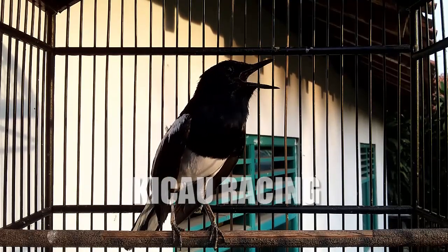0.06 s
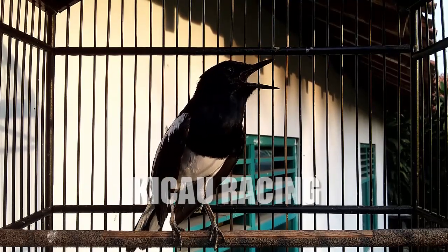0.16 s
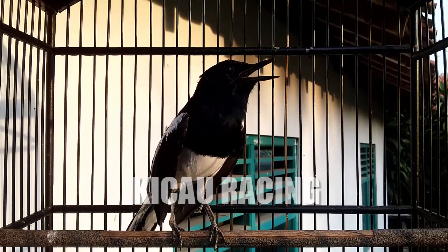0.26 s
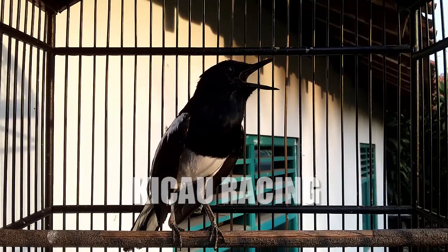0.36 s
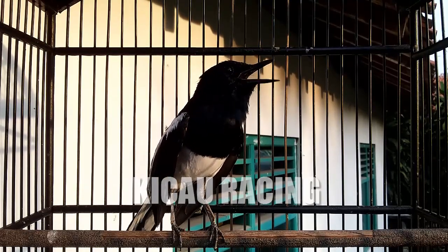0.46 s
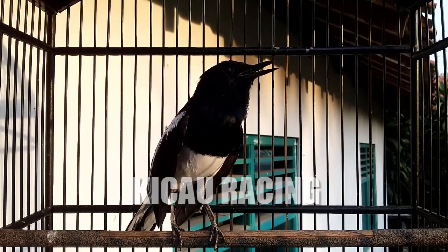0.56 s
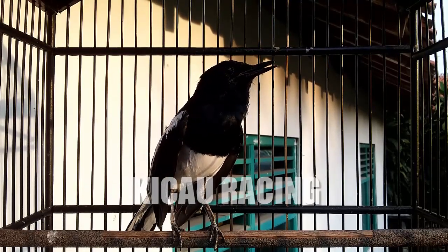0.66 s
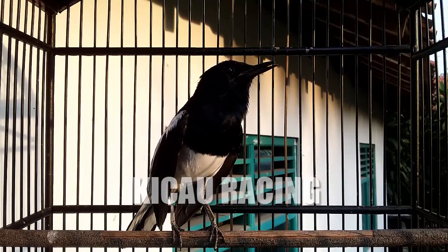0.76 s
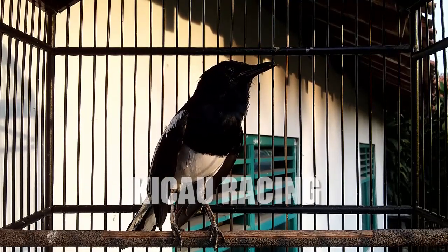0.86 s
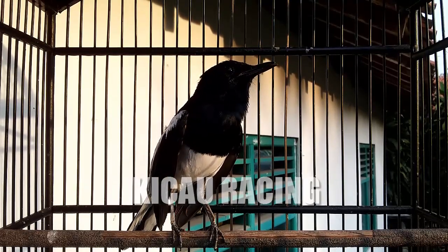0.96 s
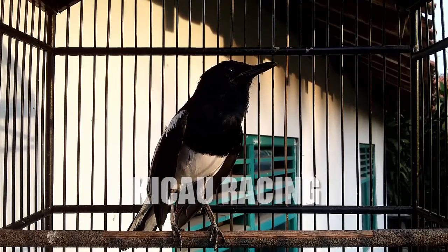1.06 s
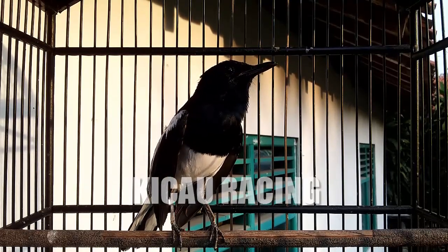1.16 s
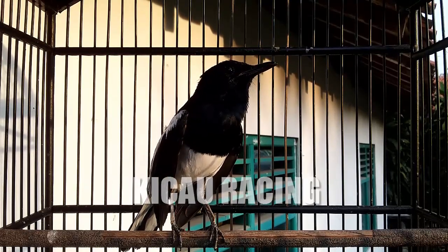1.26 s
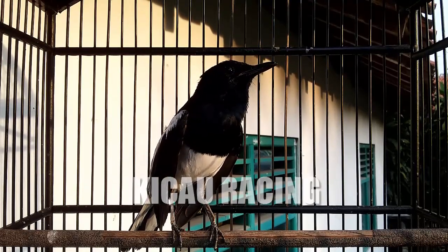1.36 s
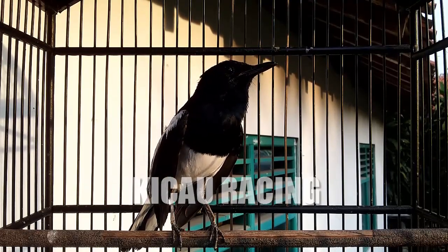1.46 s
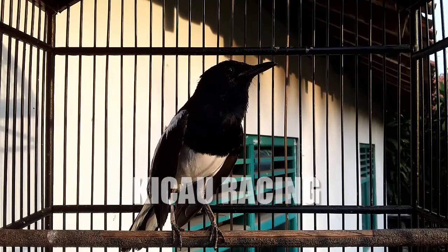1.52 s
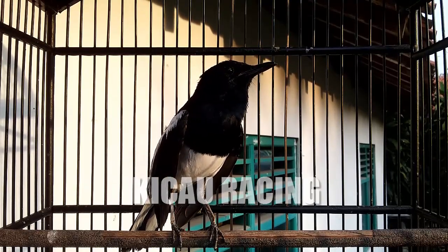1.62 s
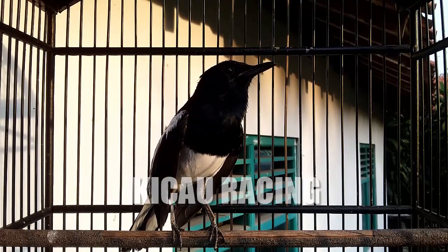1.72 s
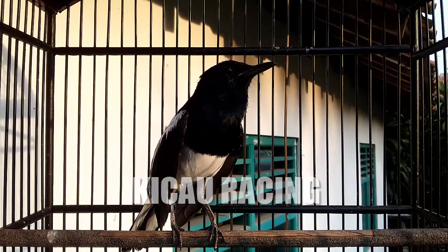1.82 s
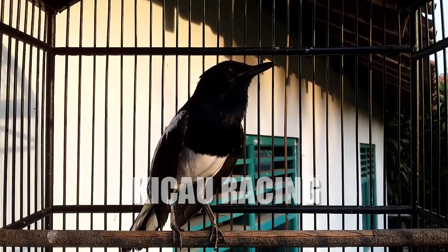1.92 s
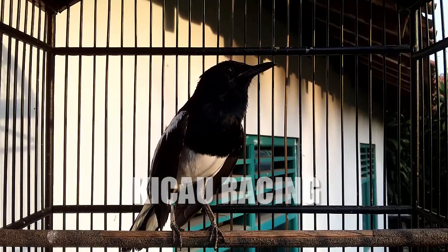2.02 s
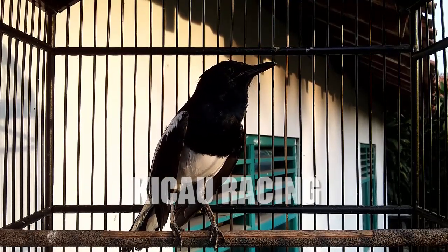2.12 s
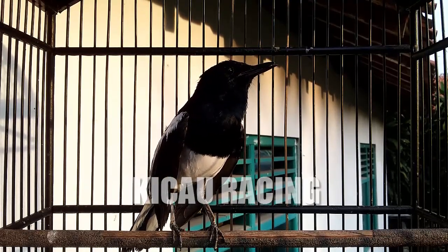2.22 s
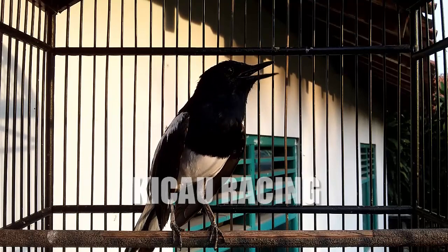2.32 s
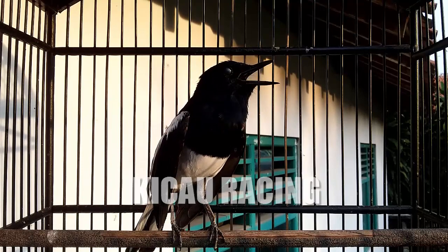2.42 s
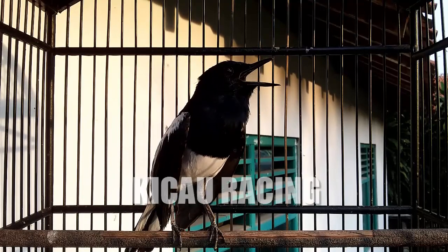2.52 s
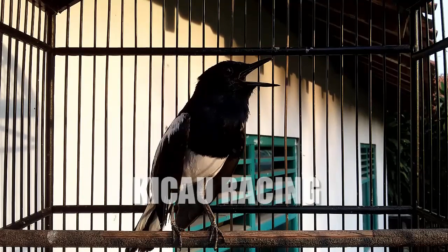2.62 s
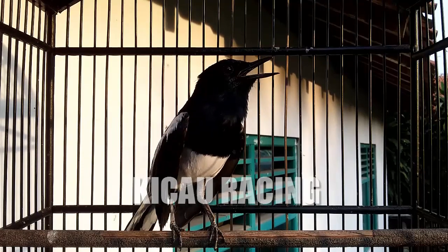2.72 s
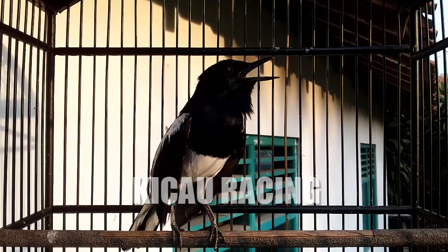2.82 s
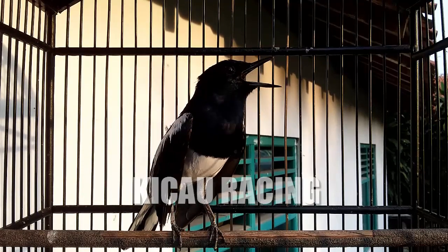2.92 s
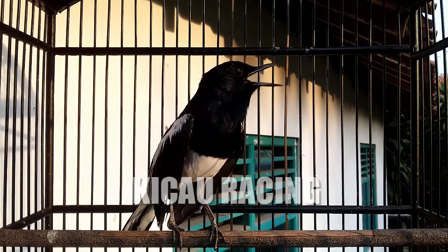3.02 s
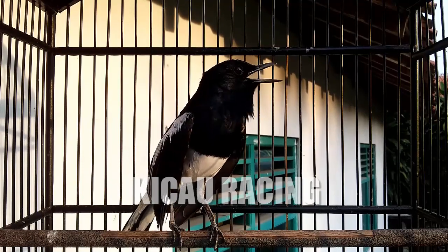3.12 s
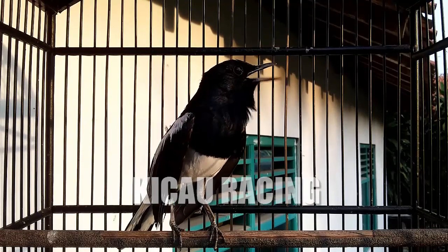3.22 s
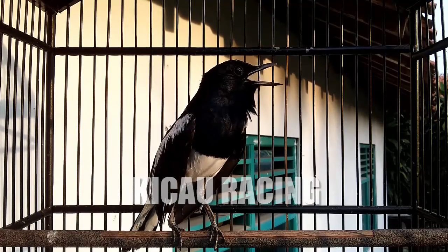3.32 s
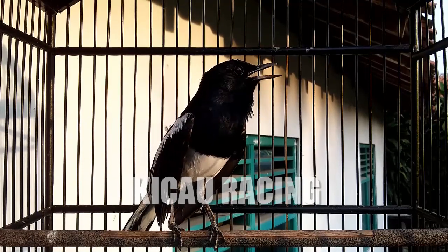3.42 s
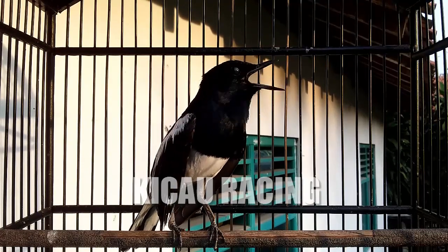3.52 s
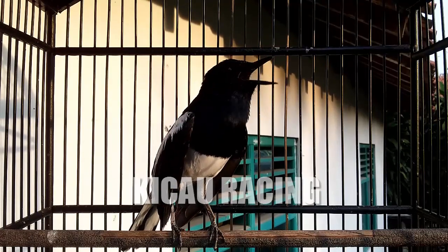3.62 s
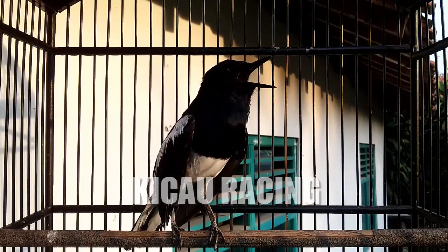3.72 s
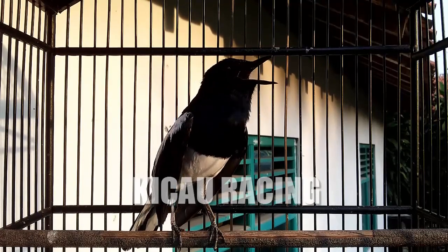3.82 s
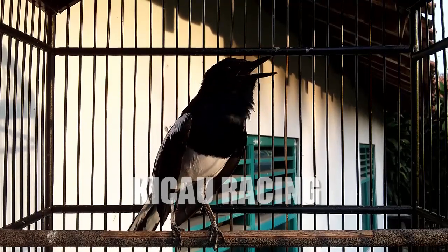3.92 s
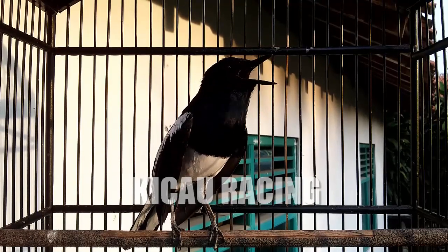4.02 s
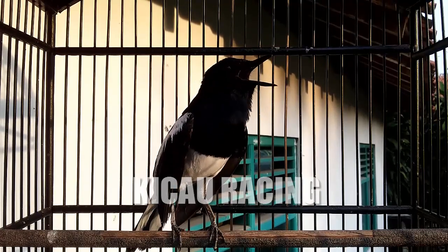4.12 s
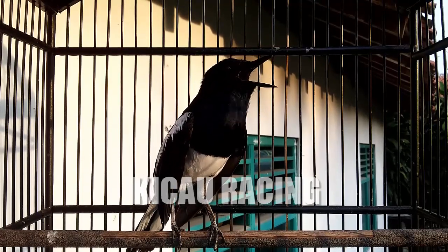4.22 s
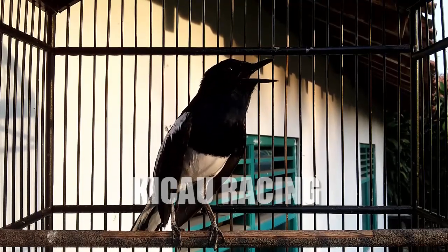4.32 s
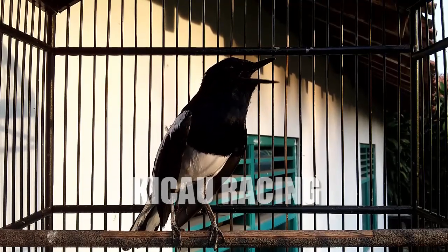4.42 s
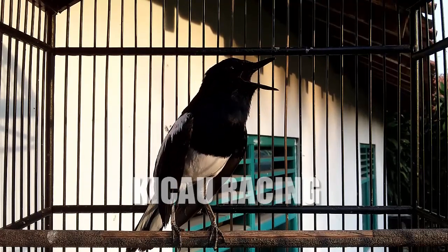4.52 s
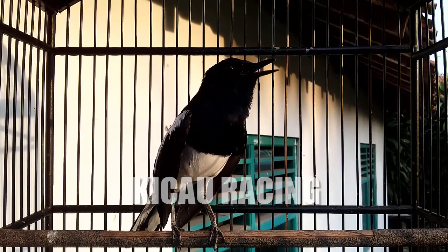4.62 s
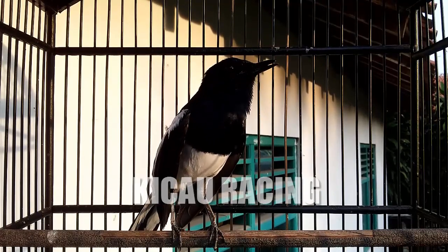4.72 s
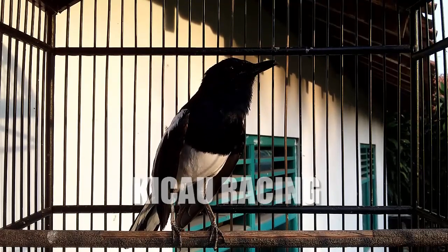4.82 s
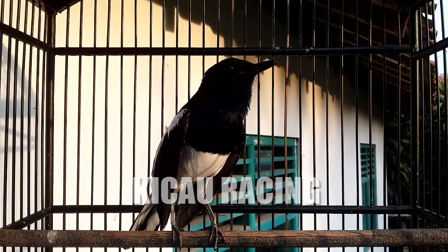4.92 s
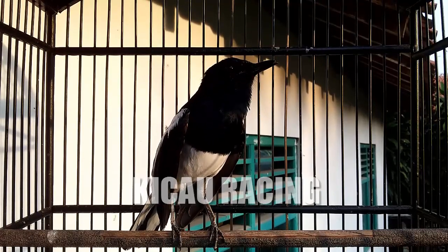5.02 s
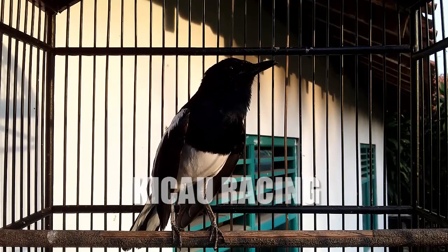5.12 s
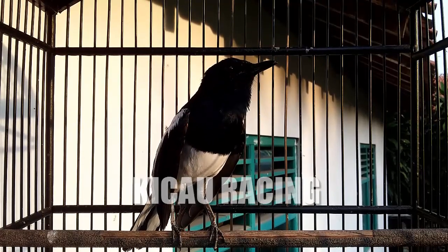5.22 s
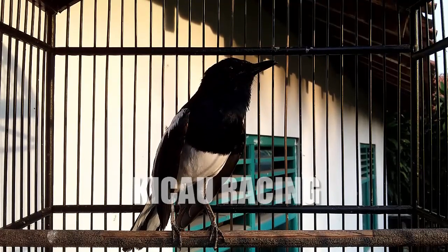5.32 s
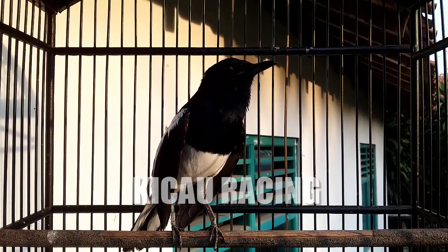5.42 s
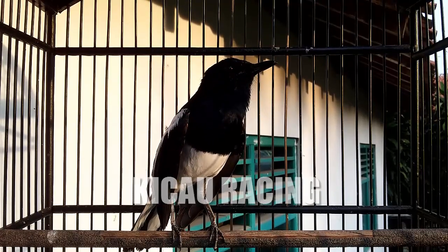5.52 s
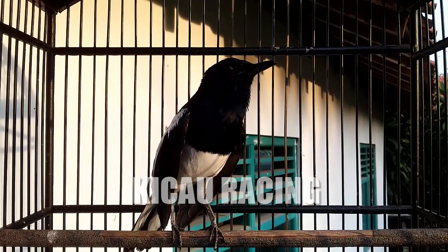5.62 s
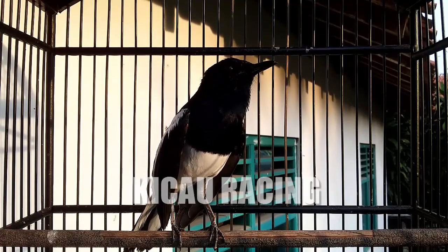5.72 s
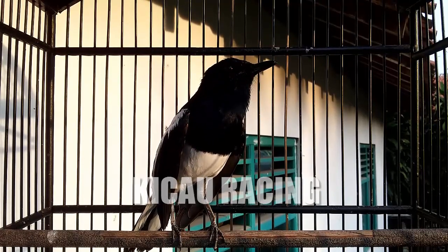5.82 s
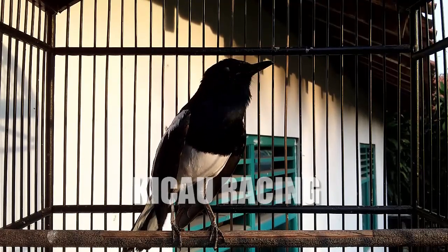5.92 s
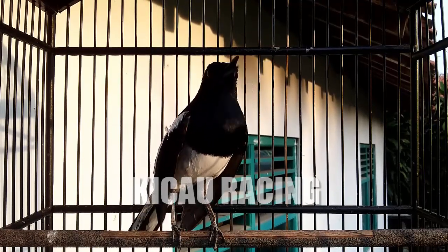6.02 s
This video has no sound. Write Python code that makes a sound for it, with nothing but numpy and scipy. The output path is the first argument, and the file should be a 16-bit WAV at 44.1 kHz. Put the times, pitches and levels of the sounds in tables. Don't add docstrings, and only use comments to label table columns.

```python
import sys
import numpy as np
from scipy import signal
from scipy.fft import rfft, irfft
from scipy.io import wavfile
from scipy.ndimage import uniform_filter1d, minimum_filter1d, map_coordinates

SR = 44100
rng = np.random.default_rng(int(sys.argv[2]) if len(sys.argv) > 2 else 0)


def elevation(decibels):
    levels = np.asarray(decibels, float)
    return 10 ** (levels / 20)


def file_out(sig):
    cols = np.atleast_2d(sig).T
    lim = np.clip(cols, -1, 1)
    pcm = np.round(lim * 32767).astype(np.int16)
    wavfile.write(sys.argv[1], SR, pcm)


N = 267246


def unit(x):
    return x / np.sqrt(np.mean(x ** 2) + 1e-20)


def along(points, hz):
    f, v = np.transpose(points)
    return np.interp(np.log(hz + 1), np.log(f + 1), v)


def wobble(rate):
    knots = rng.standard_normal(int(N * rate / SR) + 4)
    return map_coordinates(knots, [np.arange(N) * rate / SR])


def note(rows, fade, release):
    s, *cols = np.transpose(rows)
    span = np.arange(round(s[0] * SR), round(s[-1] * SR))
    t = span / SR
    gate = np.clip(np.minimum((t - s[0]) / fade, (s[-1] - t) / release), 0, 1)
    return span, gate, [uniform_filter1d(np.interp(t, s, c), size=60) for c in cols]


def blips(events, rise, life):
    out, t = np.zeros(N), np.arange(SR // 10) / SR
    for s, hz, db in events:
        shape = (1 - np.exp(-t / rise)) * np.exp(-t / life)
        out[round(s * SR):][:len(t)] += elevation(db + 6.5) * shape * np.sin(2 * np.pi * hz * t)
    return out


# t/s, f/Hz, peak level/dB
PIPS = [(2.931, 3177, -31.5), (2.94, 3810, -24.5), (3.28, 3080, -26), (3.793, 3570, -28.5),
        (3.808, 4790, -18), (4.582, 4800, -35)]
# t/s, level/dB
BREAKS = [(.193, -8), (0.214, -10), (.288, -5.5), (.51, -9), (.53, -16), (3.919, -9), (4.281, -7),
          (4.304, -14), (4.32, -9), (4.363, -7), (4.375, -6), (4.674, -7)]


def songbird():
    bend, swell = trill()
    bend = bend * (1 + .002 * wobble(300))
    swell = swell * elevation(.8 * wobble(120))
    song = np.zeros(N)
    for rows in scoops_and_arches() + warbles():
        sing(song, rows, bend, voice_db=0)
    for rows in whistled_notes():
        sing(song, rows, bend, voice_db=-12.5)
    for rows in bubbling_notes():
        sing(song, rows, bend, voice_db=-18.5, beak=1.25)
    t, half_width_s = np.arange(N) / SR, .0022
    breaks_db = sum(db * np.exp(-((t - s) / half_width_s) ** 2) for s, db in BREAKS)
    return song * swell * elevation(breaks_db) + blips(PIPS, rise=.0015, life=.003)


# f/Hz, octave over fundamental level/dB
OCTAVE = [(1650, 10), (2100, 20), (2330, 18.5), (2550, 6.5), (2850, -6), (3100, -17), (3300, -25),
          (3600, -52.5)]


def sing(song, rows, bend, voice_db, beak=1):
    span, gate, (hz, db) = note(rows, fade=0.00055, release=0.0047)
    hz = hz * bend[span]
    octave = elevation(along(OCTAVE, beak * hz) + voice_db) + elevation(-40)
    turn = 2 * np.pi * np.cumsum(hz) / SR
    tone = np.sin(turn) + octave * (np.sin(2 * turn) + elevation(-30) * np.sin(3 * turn))
    song[span] += gate * elevation(db + 5.0) * tone


# start t/s, end t/s, start rate f/Hz, pitch swing [share], level swing [0-1]
TRILLS = [(.46, .497, 310, .03, .55), (.568, .635, 175, .018, .45), (2.51, 2.55, 165, .026, .5),
          (2.988, 3.065, 200, .105, .3), (3.058, 3.125, 98, .05, .6), (3.305, 3.338, 280, .02, .5),
          (3.42, 3.47, 175, .015, .25), (.079, .125, 260, .015, .35), (4.169, 4.215, 260, .015, .35),
          (.189, .242, 140, .015, .3), (4.6, 4.64, 300, .02, .55), (4.68, 4.708, 200, .012, .2),
          (4.71, 4.765, 170, .018, .45)]


def trill():
    t = np.arange(N) / SR
    bend, swell = np.ones(N), np.ones(N)
    for start, end, rate, swing, depth in TRILLS:
        inside = np.clip(np.minimum(t - start, end - t) / 0.011, 0, 1)
        rate_now = np.interp(t, [start, end], [rate, rate * .8])
        turn = 2 * np.pi * np.cumsum(rate_now * (inside > 0)) / SR + 1.56 * wobble(90)
        bend += inside * swing * (np.sin(turn) + .4 * wobble(500))
        swell += inside * depth * (np.cos(turn + 0.48) - .4)
    return bend, swell


def played(shape, starts):
    return [[(s + after, hz * factor, level + db) for after, hz, level in shape] for s, factor, db in starts]


# t/s after start, f/Hz, level/dB
SCOOP = [(0, 1630, -49), (.028, 2283, -37), (.04, 2500, -37.5), (.048, 2730, -35), (.069, 3440, -44)]
SCOOP_TWIN = [(.003, 1990, -48.5), (.012, 2220, -41), (.022, 2510, -39.5), (.031, 2880, -24.5)]
GRACE = [(0, 1903, -48.5), (.008, 2192, -39.5), (.017, 2400, -39.5)]
ARCH = [(.012, 1726, -39), (.021, 2066, -36.5), (.027, 2280, -32), (.046, 3060, -23.5), (.06, 3340, -24.5),
        (.072, 3302, -20.5), (.081, 2693, -40)]
# start t/s, pitch factor, level/dB
SCOOPS = [
    (.079, 1.01, 2.4),
    (4.169, .99, 2.5),
]
ARCHES = [
    (0.46, .99, 0.7),
    (4.6, 1.01, 2.1),
]


def scoops_and_arches():
    scoops = played(SCOOP, SCOOPS) + played(SCOOP_TWIN, SCOOPS)
    return scoops + played(GRACE, ARCHES) + played(ARCH, ARCHES)


# t/s, f/Hz, level/dB
WARBLE_IN = [
    [(.106, 3376, -26.5), (.117, 4144, -10), (.128, 4365, -14.5), (.138, 4600, -14.5), (.148, 4426, -8.5),
     (.157, 4147, -8), (.178, 4189, -6.5)],
    [(4.196, 3257, -19), (4.204, 3900, -26), (4.209, 4150, -10), (4.217, 4374, -14), (4.238, 4520, -11.5),
     (4.247, 4146, -8.5), (4.258, 3998, -9), (4.272, 4153, -4.5)],
]
# crest t/s, crest f/Hz, level/dB, trough f/Hz, fall t/s
BEATS = [
    [(.189, 4013, -5.5, 3520, 0.012), (.223, 3970, -8, 3373, .011), (.262, 3766, -9.5, 2994, 0.012),
     (.296, 3310, -19, 2508, 0.02), (.337, 2864, -23, 2327, 0.014)],
    [(4.278, 4120, -7, 3590, 0.015), (4.316, 3954, -5.5, 3450, 0.0098), (4.353, 3740, -8, 3114, 0.012),
     (4.386, 3320, -17.5, 2590, .017), (4.425, 2894, -19, 2391, .018)],
]
# t/s, f/Hz, level/dB
WARBLE_OUT = [
    [(.365, 2298, -40), (.372, 2280, -50.5)],
    [(4.467, 2373, -28), (4.477, 2185, -40), (4.495, 1880, -49.5)],
]


def warbles():
    return list(map(warble, WARBLE_IN, BEATS, WARBLE_OUT))


def warble(first, beats, last):
    rows = list(first)
    for s, crest, db, trough, fall in beats:
        before_s, before_hz, _ = rows[-1]
        if before_hz < .97 * crest:
            up = before_s + .45 * (s - before_s)
            rows += [(up, crest, db - 7), (up + .4 * (s - up), crest, db - 3)]
        rows += [(s, crest, db),
                 (s + 0.42 * fall, crest + 0.26 * (trough - crest), db - 8),
                 (s + fall, trough, db - 8.5),
                 (s + fall + .006, trough, db - 8.5 - 2)]
    return rows + last


# t/s, f/Hz, level/dB
SWOOPS = [
    [(.52, 5780, -30.5), (.54, 5303, -16.5), (.552, 4393, -8), (.565, 4109, -5), (.58, 3887, -16.5),
     (.597, 3695, -10.5), (.626, 3629, -21), (.635, 3730, -30)],
    [(4.66, 5852, -25.5), (4.673, 5755, -21.5), (4.68, 5446, -19), (4.687, 4760, -9), (4.707, 4120, -5.5),
     (4.732, 3825, -15.5), (4.743, 3724, -9.5), (4.765, 3507, -27.5)],
]
CHIRP = [(2.509, 3933, -41.5), (2.514, 4098, -9), (2.52, 3220, -18), (2.525, 2846, -21),
         (2.534, 3053, -13.5), (2.541, 3334, -15.5)]
LONG_WHISTLE = [(2.591, 3527, -4), (2.641, 3660, -9), (2.778, 3746, -3.5), (2.795, 3769, -7),
                (2.814, 3748, -2.5), (2.828, 3635, -23)]
RASP = [(2.948, 3182, -23.5), (2.954, 3250, -27.5), (2.961, 3384, -12.5), (2.977, 3480, -4.5),
        (3.005, 3086, -10.5), (3.022, 2787, -15.5), (3.038, 2684, -18.5), (3.052, 2850, -17)]
CLIMB = [(3.062, 3620, -12.5), (3.074, 4126, -9.5), (3.095, 4658, -7), (3.122, 4920, 5),
         (3.138, 4983, -15.5), (3.141, 4995, -8.5), (3.153, 5038, -12.5), (3.173, 4939, -6),
         (3.194, 4980, -24)]
# t/s, f/Hz, level/dB
SHORT_NOTES = [
    [(3.649, 4374, -40.5), (3.654, 4180, -12), (3.661, 4720, -8.5), (3.666, 4970, -14.5),
     (3.674, 5020, -15), (3.69, 5110, -26.5)],
    [(3.673, 4067, -20), (3.678, 4106, -12.5), (3.685, 4282, -6.5), (3.715, 4480, -7.5),
     (3.733, 4408, -0.5), (3.739, 4390, -30.5), (3.745, 4320, -16), (3.753, 4100, -31)],
    [(3.806, 3684, -19), (3.81, 3692, -21.5), (3.818, 4003, -24), (3.829, 3982, -8.5), (3.852, 4122, -6.5),
     (3.882, 4176, -11.5), (3.906, 4020, -6.5), (3.919, 3920, -16.5), (3.93, 4000, -20.5)],
    [(3.995, 3970, -25), (4.001, 3754, -24), (4.019, 3748, -9.5), (4.044, 3507, -10), (4.06, 3377, -11),
     (4.065, 3347, -19.5), (4.088, 3123, -17), (4.105, 2600, -29.5)],
]


def whistled_notes():
    return SWOOPS + [CHIRP + LONG_WHISTLE, RASP + CLIMB] + SHORT_NOTES[:3]


# t/s, f/Hz, level/dB
FLICK = [(3.295, 3093, -25), (3.308, 3169, -17.5), (3.313, 3750, -14.5), (3.319, 4892, -15),
         (3.322, 4483, -13.5), (3.333, 2306, -14.5)]
BUBBLE = [(3.336, 2064, -22.5), (3.344, 2001, -23.5), (3.351, 2630, -15.5), (3.359, 1990, -24),
          (3.368, 2108, -28), (3.375, 2435, -17.5), (3.385, 1800, -28), (3.403, 1803, -30.5),
          (3.41, 1923, -25.5)]
SETTLE = [(3.424, 4380, -13.5), (3.433, 4200, -10), (3.437, 4015, -20), (3.441, 3560, -8.5),
          (3.46, 3315, -19.5), (3.468, 3293, -26.5), (3.481, 3229, -17.5), (3.516, 3130, -11),
          (3.55, 3256, -27)]


def bubbling_notes():
    return [FLICK + BUBBLE + SETTLE, SHORT_NOTES[3]]


# t/s, f/Hz, peak level/dB
TAPS = [
    (4.539, 116, -35.5),
    (4.879, 201, -49),
]


def perch():
    return blips(TAPS, rise=.0002, life=.005)


# f/Hz, width f/Hz, level/dB, t60 t/s
EARLIER = [
    (3130, 500, -18, 0.06),
    (3450, 800, -32.5, 0.68),
]


def earlier_note():
    hz, t = np.fft.rfftfreq(N, 1 / SR), np.arange(N) / SR
    out = np.zeros(N)
    for centre, width, db, t60 in EARLIER:
        spectrum = rfft(rng.standard_normal(N)) * np.exp(-((hz - centre) / width) ** 2 * 2)
        out += unit(irfft(spectrum, N)) * elevation(db - 60 * t / t60)
    return out


# delay t/s, level/dB
WALLS = [(.0031, -20.5), (.0068, -17), (.0115, -28.5), (.019, -22), (.027, -38.5)]
# f/Hz, t60 t/s
RING = [(1500, .4), (3000, .55), (3800, .78), (4300, .62), (5500, .6), (8000, .35)]


def walls(x, close_db, long_db):
    t = np.arange(SR) / SR
    answer = np.zeros(SR)
    for delay, db in WALLS:
        answer[round(delay * SR)] = elevation(db)
    scatter = rng.standard_normal(SR) * elevation(-60 * t / 0.29)
    hz, frames, z = signal.stft(rng.standard_normal(SR), SR, nperseg=256)
    z = z * elevation(-60 * frames / along(RING, hz)[:, None])
    tail = signal.istft(z, SR, nperseg=256)[1][:SR]
    answer += elevation(close_db) * scatter / np.linalg.norm(scatter)
    answer += elevation(long_db) * tail / np.linalg.norm(tail)
    return x + signal.fftconvolve(x, answer)[:N]


def far_tone(rows, waver, flutter_db):
    span, gate, (hz, db) = note(rows, fade=0.021, release=.02)
    out = np.zeros(N)
    turn = 2 * np.pi * np.cumsum(hz * (1 + waver * wobble(38)[span])) / SR
    out[span] = gate * elevation(db + 4.0 + flutter_db * wobble(22.73)[span]) * np.sin(turn)
    return out


# t/s, f/Hz, level/dB
WHISTLE = [(.95, 2740, -76.5), (1.0, 2740, -58), (1.03, 2690, -72), (1.06, 2705, -59), (1.3, 2757, -53),
           (1.45, 2725, -61), (1.6, 2750, -71), (1.7, 2740, -69)]
WHISTLE_DROP = [(1.59, 2720, -54), (1.63, 2550, -62.5), (1.68, 2206, -63), (1.715, 2120, -79)]
WHISTLE_AGAIN = [(3.44, 2840, -65), (3.56, 2784, -42.5), (3.65, 2884, -46), (3.8, 2810, -56),
                 (3.93, 2870, -52), (3.98, 2790, -50), (4.04, 2560, -54)]


def far_bird():
    first = far_tone(WHISTLE, waver=.001, flutter_db=1.8)
    drop = far_tone(WHISTLE_DROP, waver=.001, flutter_db=.8)
    again = far_tone(WHISTLE_AGAIN, waver=.002, flutter_db=3)
    return walls(first + drop + again, close_db=-20, long_db=-13)


# t/s, f/Hz, level/dB
COO = [(1.7, 490, -72), (1.76, 455, -65), (1.82, 430, -65), (1.88, 400, -67), (1.96, 415, -65),
       (2.06, 445, -66), (2.14, 425, -63), (2.24, 400, -64), (2.32, 400, -68)]


def dove():
    return far_tone(COO, waver=.006, flutter_db=1.5)


# f/Hz, level/dB per Hz
HUM = [(15, -45.5), (25, -12), (97, 0.5), (245, -8.5), (339, -11), (422, -8), (496, -16.5), (634, -17.5),
       (2330, -25.5), (4600, -25.5), (6730, -38), (14800, -39.5), (16500, -63)]
# t/s, level/dB
YARD = [(0, -57.5), (.7, -56.5), (1.1, -58), (1.41, -56), (1.45, -63), (1.9, -60), (2.5, -55), (4.8, -56),
        (5.2, -59), (5.57, -55.5), (5.6, -66), (6.06, -60)]


def yard_db():
    return np.interp(np.arange(N) / SR, *np.transpose(YARD))


def yard():
    hz, t, z = signal.stft(rng.standard_normal(N + 512), SR, nperseg=512)
    field = uniform_filter1d(rng.standard_normal(z.shape), size=6, axis=0)
    patches = unit(uniform_filter1d(field, size=12, axis=1))
    z = z * elevation(along(HUM, hz)[:, None] + 1.4 * patches)
    hum = signal.istft(z, SR, nperseg=512)[1][:N]
    return unit(hum) * elevation(yard_db())


def insects():
    hz = np.fft.rfftfreq(N, 1 / SR)
    band = irfft(rfft(rng.standard_normal(N)) * np.exp(-((hz - 4600) / 900) ** 2), N)
    gain_db = yard_db()
    return unit(band) * elevation(-69.5 + 1.4 * (gain_db - np.median(gain_db)) + 1.5 * wobble(12))


def scene():
    bird = walls(songbird(), close_db=-18, long_db=-29)
    return (bird + earlier_note() + perch() + far_bird() + dove() + yard() + insects())[None]


def limited(x, top):
    need = np.minimum(1, top / (abs(x) + 1e-9))
    return x * uniform_filter1d(minimum_filter1d(need, size=401), size=201)


def nearest_sample(x):
    source_rate, block_out, block_start = 48000, 941, 727
    place = ((np.arange(N) - block_start) % block_out) * source_rate / SR
    late = (place % 1) * SR / source_rate
    return map_coordinates(x, [np.arange(N) - late], order=5, mode="nearest")


def roll_off(x):
    return signal.sosfilt(signal.butter(12, 16670, fs=SR, output="sos"), x)


def record(dry):
    cut = signal.sosfilt(signal.butter(4, 48, "high", fs=SR, output="sos"), dry[0])
    picked = nearest_sample(limited(cut, top=.92))
    mix = signal.sosfiltfilt(signal.ellip(8, .1, 50, 15750, fs=SR, output="sos"), picked)
    return roll_off(mix[None])


dry = scene()
out = record(dry)
file_out(out)
```